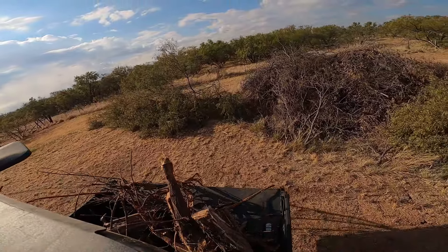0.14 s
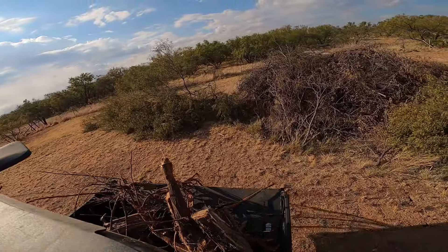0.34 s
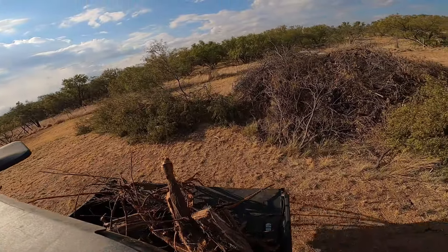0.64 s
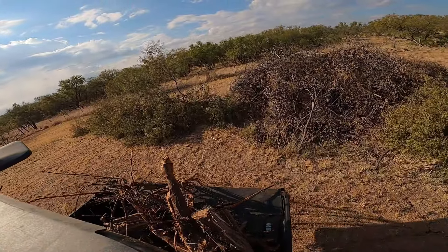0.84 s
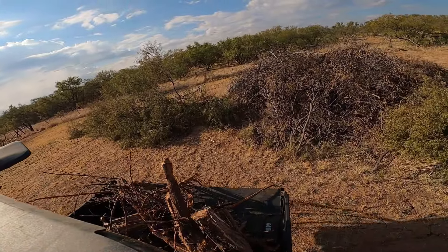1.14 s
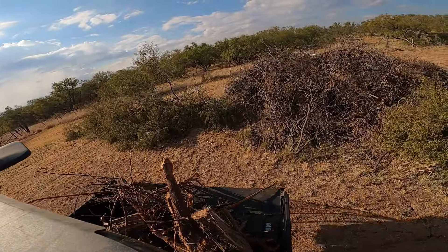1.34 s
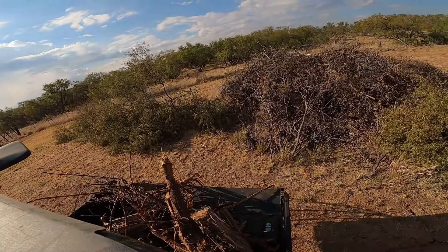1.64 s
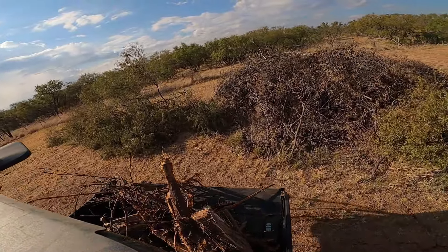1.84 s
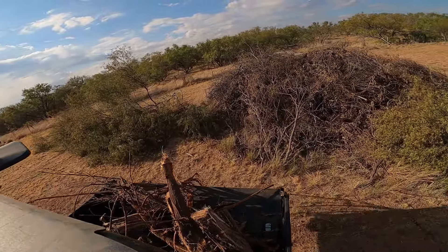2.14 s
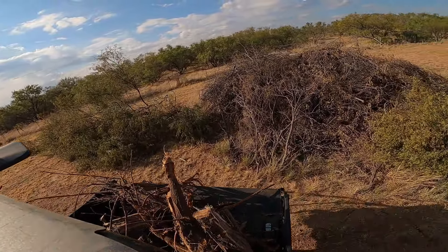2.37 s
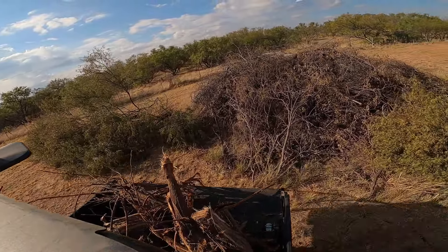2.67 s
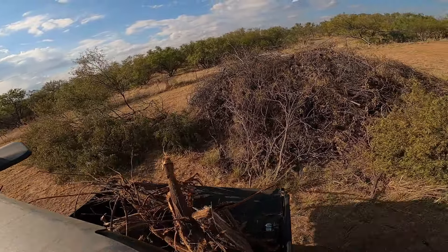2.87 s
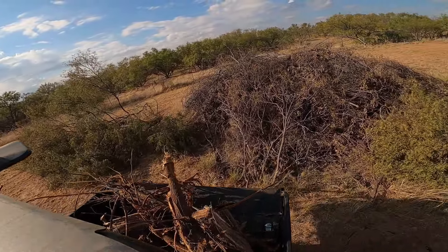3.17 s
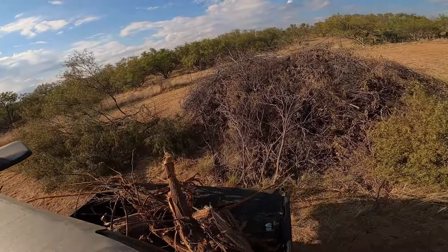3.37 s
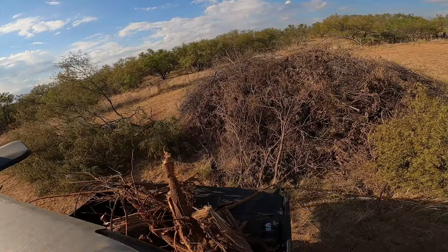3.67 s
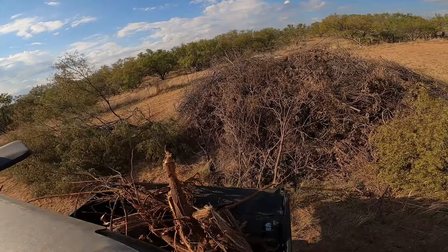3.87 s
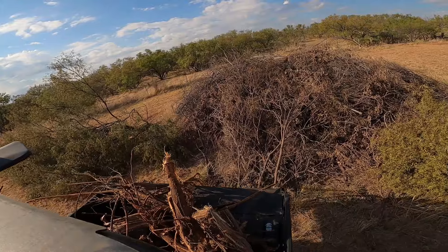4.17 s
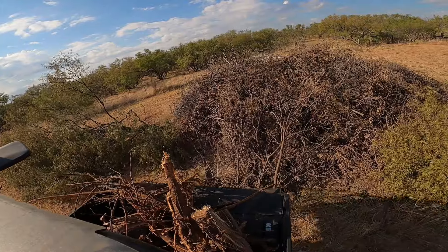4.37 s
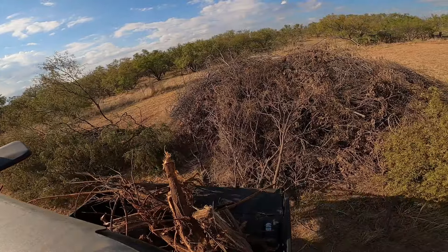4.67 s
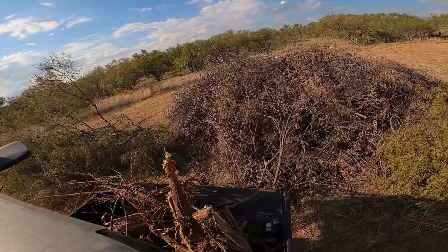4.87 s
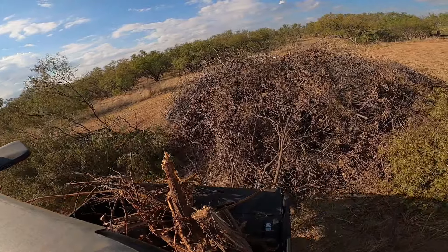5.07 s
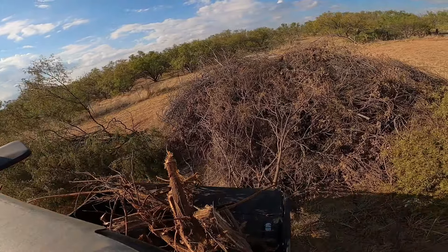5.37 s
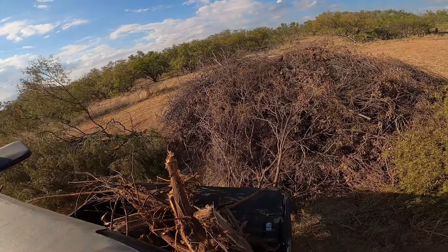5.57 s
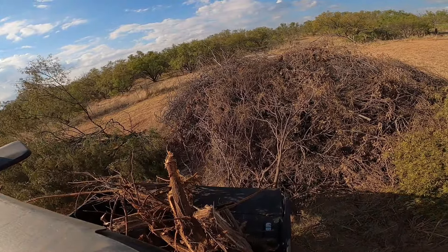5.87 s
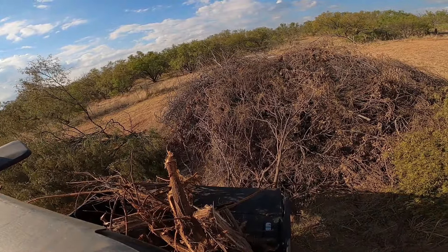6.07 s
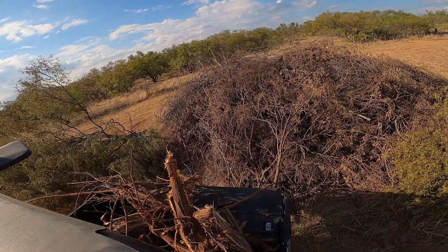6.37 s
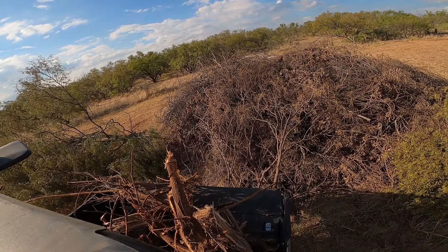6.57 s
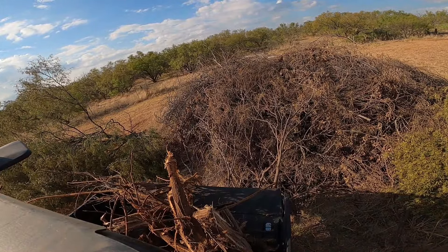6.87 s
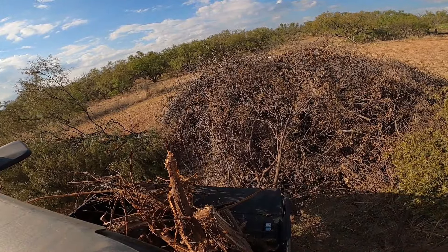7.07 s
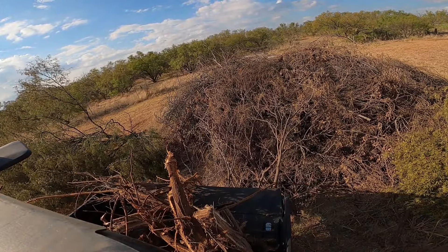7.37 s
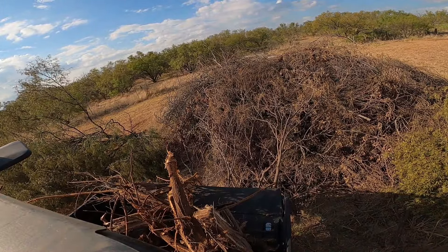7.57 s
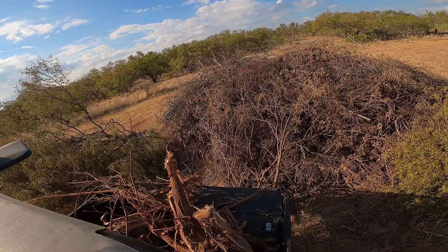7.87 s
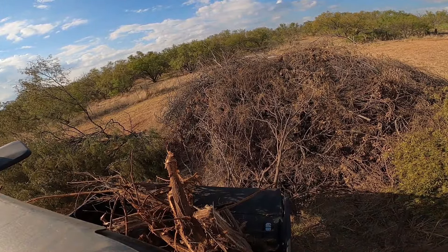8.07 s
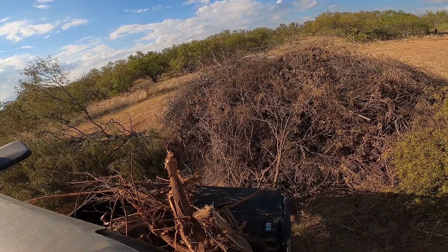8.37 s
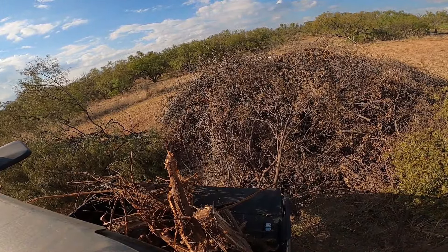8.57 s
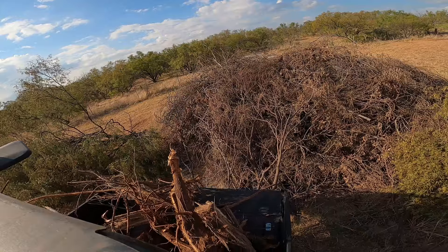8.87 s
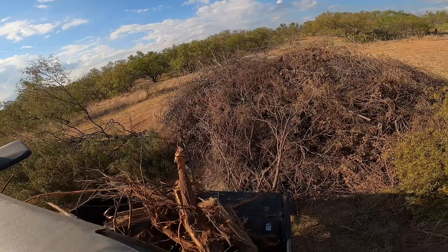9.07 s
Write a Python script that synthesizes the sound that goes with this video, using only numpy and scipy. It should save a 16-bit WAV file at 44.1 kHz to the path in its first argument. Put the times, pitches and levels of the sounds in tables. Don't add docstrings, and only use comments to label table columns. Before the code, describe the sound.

Heard from the roof of a small diesel utility vehicle in open dry country: a droning, chugging engine with buzzing panels and a rattling bed works for five seconds, then drops quickly to a lower, lumpy idle. Low wind thumps buffet the microphone and thin dry hiss comes and goes. Near the end a hard clunk lands as a hydraulic pump starts humming.

```python
import sys
import numpy as np
from scipy import signal
from scipy.fft import rfft, irfft
from scipy.io import wavfile
from scipy.ndimage import uniform_filter1d, minimum_filter1d

SR = 44100
rng = np.random.default_rng(int(sys.argv[2]) if len(sys.argv) > 2 else 0)


def voltage_ratio(level):
    return 10 ** (np.asarray(level, float) / 20)


def materialize(psi):
    bounded = np.clip(np.atleast_2d(psi).T, -1, 1)
    quanta = np.round(bounded * 32767).astype(np.int16)
    wavfile.write(sys.argv[1], SR, quanta)


N = 406602


def curves(table):
    s, *columns = np.transpose(table)
    return [np.interp(np.arange(N) / SR, s, c) for c in columns]


def unit(x):
    return x / np.sqrt(np.mean(x ** 2))


def noise(n=N):
    return rng.standard_normal(n)


def band(x, lo_hz, hi_hz, order=2):
    edges = [lo_hz, min(hi_hz, .45 * SR)]
    return signal.sosfilt(signal.butter(order, edges, "band", fs=SR, output="sos"), x)


def walk(rate_hz):
    k = int(SR / rate_hz)
    held = np.repeat(noise(N // k + 1), k)[:N]
    return unit(uniform_filter1d(uniform_filter1d(held, k), k))


def colour(x, points):
    hz, db = np.transpose(points)
    f = np.maximum(np.fft.rfftfreq(N, 1 / SR), 1)
    return irfft(rfft(x) * voltage_ratio(np.interp(np.log(f), np.log(hz), db)), N)


def spell(start_s, length_s, edge_s):
    t = np.arange(N) / SR
    return np.clip(np.minimum(t - start_s, start_s + length_s - t) / edge_s + .5, 0, 1)


# start_s, length_s, air_gain_db, topmost_band_share_db
HISS_SPELLS = [
    (1.306, .12, 2, 1),
    (2.601, 1.3, 3, -3),
    (4.459, .66, 4.5, -1.5),
    (5.157, .6, 5, 0),
    (5.74, 0.94, 0.5, -1.5),
    (7.207, 2.1, 0, -1),
]


def air():
    usual_top_db, edge_s = -18, .14
    level_db, top_db = -81 + 1.5 * walk(4), usual_top_db + 2 * walk(6)
    for start_s, length_s, gain_db, share_db in HISS_SPELLS:
        bright = spell(start_s, length_s, edge_s)
        level_db = level_db + gain_db * bright
        top_db = top_db + (share_db - usual_top_db) * bright
    low = unit(band(noise(), 9000, 12300, order=5))
    top = unit(band(noise(), 12300, 16000, order=5))
    return voltage_ratio(level_db) * (low + voltage_ratio(top_db) * top)


# start_s, length_s, rumble_db
GUSTS = [(0.02, 0.036, -19), (0.155, 0.11, -23), (0.333, 0.21, -34.5), (1.011, 0.035, -26),
         (1.369, 0.13, -25), (2.64, 0.3, -25.5), (3.125, 0.068, -31.5), (3.543, 0.066, -28),
         (3.667, 0.039, -32), (5.18, 0.092, -28), (5.491, 0.036, -53), (5.979, 0.14, -27),
         (6.249, 0.032, -35), (6.328, 0.036, -27), (6.642, 0.065, -36), (6.854, 0.13, -40),
         (7.174, 0.046, -27), (7.383, 0.075, -36), (7.795, 0.094, -27.5), (7.95, 0.14, -42),
         (8.264, 0.066, -37), (8.496, 0.072, -35)]
# start_s, length_s, level_db
FLAPS = [
    (0.136, 0.16, -28.5),
    (0.42, 0.14, -24),
    (1.286, 0.2, -25.5),
    (3.541, 0.22, -30),
    (3.816, 0.27, -31.5),
    (6.451, 0.53, -43.5),
]


def wind():
    edge_s = 0.14
    breeze = voltage_ratio(-31.5 + 1.4 * walk(9.9))
    gusts = sum(voltage_ratio(db - 2) * spell(s, length, edge_s) for s, length, db in GUSTS)
    flaps = sum(voltage_ratio(db) * spell(s, length, edge_s) for s, length, db in FLAPS)
    rumble = unit(band(noise(), 28, 64.5, order=3))
    buffet = unit(band(noise(), 84.9, 143.5, order=4)) * voltage_ratio(2.1 * walk(25))
    return (breeze + gusts) * rumble + (voltage_ratio(-4) * breeze + voltage_ratio(-14.5) * gusts + flaps) * buffet


# start_s, end_s, pitch_hz, width_hz, level_db
WHISTLES = [
    (5.2, 5.66, 10540, 220, -79),
    (5.05, 5.92, 862, 14, -59),
    (1.5, 2.15, 872, 22, -53),
]


def brake():
    out = 0
    for start_s, end_s, hz, width, db in WHISTLES:
        tone = unit(band(noise(), hz - width / 2, hz + width / 2))
        out = out + voltage_ratio(db) * spell(start_s, end_s - start_s, .08) * tone
    return out


# start_s, peak_db, centre_hz, t60_s
JOLTS = [(1.36, -42, 900, .3), (4.35, -44, 2000, .12), (9.035, -44, 800, .08), (2.645, -31, 230, .15),
         (8.82, -38, 330, .25), (8.876, -22, 370, .2), (8.878, -29, 540, .17), (8.876, -39, 950, .2),
         (8.88, -46, 2300, .2), (6.52, -36, 260, .8), (1.3, -33, 300, .5)]


def jolts():
    out, t = np.zeros(N), np.arange(SR // 2) / SR
    for s, db, hz, t60 in JOLTS:
        tail = (1 - np.exp(-t / .012)) * voltage_ratio(-60 * t / t60)
        knock = voltage_ratio(db) * tail * unit(band(noise(len(t)), hz * 0.7, hz * 1.5))
        i = int(s * SR)
        out[i:i + len(t)] += knock[:N - i]
    return out


# multiple, level_db, throb_depth (0-1)
PUMP_OVERTONES = [
    (2, .5, .12),
    (3, -23, .3),
    (4, -13.5, .35),
    (4.176, -19.5, .2),
]


def pump(firings):
    start_s, loaded_s, free_hz, loaded_hz = 8.765, 8.92, 209, 205.4
    t = np.arange(N) / SR
    load = np.clip((t - loaded_s) / .07 + .5, 0, 1)
    hz = free_hz + (loaded_hz - free_hz) * load
    level_db = -29.5 + 3 * (t - start_s)
    over_db = np.interp(load, (0, 1), (-14, -4))
    turn = 2 * np.pi * np.cumsum(hz) / SR + .06 * walk(30)
    shake = np.cos(2 * np.pi * firings)
    over = 0
    for k, db, depth in PUMP_OVERTONES:
        waver = voltage_ratio(.15 * k ** 2 * walk(40))
        over = over + voltage_ratio(db) * np.sin(k * turn) * (1 + depth * shake) * waver
    frame = voltage_ratio(-13) * load * unit(band(noise(), 290, 620))
    running = np.clip((t - start_s) / 0.021, 0, 1)
    return np.sqrt(2) * running * voltage_ratio(level_db) * (np.sin(turn) + voltage_ratio(over_db) * over + frame)


SHAKE_RISE_S = 0.09
STATE_HZ = (37, 42, 45)
RATTLE_DB = (-51.5, -50.5, -48)
# start_s, swell_db, hold_s, fade_s
SHAKES = [
    (-.1, 7, 0.36, 0.9),
    (1.337, 2.5, 0.67, 0.7),
    (3.654, 3.5, 0.5, 0.42),
    (5.206, 4, 0.11, 0.26),
    (6.49, 4, .45, 0.51),
]


def shaking(hz):
    t, db = np.arange(N) / SR, np.interp(hz, STATE_HZ, RATTLE_DB)
    for s, swell_db, hold, fade in SHAKES:
        rise = np.clip((t - s) / SHAKE_RISE_S, 0, 1)
        db = db + swell_db * rise * np.exp(-np.maximum(t - s - hold, 0) / fade)
    return db


# pitch_hz, level_db
RATTLE_COLOUR = [(90, -34), (150, -12), (210, -12), (280, -14.5), (350, -13), (420, -19), (700, -22.5),
                 (1000, -26), (1550, -30), (1850, -27), (2300, -31.5), (3900, -37), (6000, -45),
                 (7500, -46), (8700, -52), (9500, -64), (12000, -100)]
# pitch_hz, width_hz, pulling_db, rolling_db, idling_db
PANELS = [(700, 90, -8, -5, -7), (1120, 45, -5.5, -2, -1), (1340, 70, -.5, .5, 2), (1645, 50, -9, -7, -9),
          (1820, 200, -9, -8, -4), (2025, 70, -5.5, -4.5, -7), (2715, 130, -7.5, -5.5, -8.5),
          (3370, 80, -12, -12, -12), (3950, 240, -9, -8.5, -11), (5470, 80, -21, -21, -19),
          (6800, 120, -24, -24, -24)]
STRIKES = [(.75, .15, 0), (.32, .6, 1), (.43, .75, 2), (.87, .45, 0), (.6, .15, 1), (.27, .4, 2),
           (.22, .55, 0), (.5, .3, 1), (.2, .2, 1), (.35, .2, 2), (.3, .2, 0)]
BEAT_SHARE = (.55, .8, .8, 1.15)
BODY_DB = (1.5, 2.5, 0, -1)
BED_DB = (0., -0.33, -1.1, -1.1)
RING_DB = (-8, -6.5, -4.5)
# pitch_hz, level_db
RING_EDGES = [(200, -30), (500, 0), (7500, 0), (9300, -30), (13000, -60)]


def rattle(hz, state, firings, chug_db):
    level_db = shaking(hz)
    swell_db = level_db - np.interp(hz, STATE_HZ, RATTLE_DB) - 0.5
    ring_db = np.interp(hz, STATE_HZ, RING_DB) - .4 * swell_db
    buzz_db = 4 * spell(-.2, 1.35, SHAKE_RISE_S)
    broad = colour(noise(), RATTLE_COLOUR)
    broad = broad / np.std(band(broad, 906, 4800, order=4))
    bed_gain = voltage_ratio(np.interp(state, range(4), BED_DB)) - 1
    broad = broad + bed_gain * band(broad, 420, 880, order=1)
    ring = 0
    for (mode, width, pull_db, roll_db, idle_db), (turn, depth, hardest) in zip(PANELS, STRIKES):
        db = np.interp(state, range(3), (idle_db, roll_db, pull_db))
        if 1340 <= mode < 1690:
            db = db + buzz_db
        count = (firings - turn + 1.5).astype(int)
        blow = voltage_ratio(1.3 * noise(N // 500)[count] + 3.5 * (count % 3 == hardest))
        share = depth * np.interp(state, range(4), BEAT_SHARE)
        pulse = 1 + np.cos(2 * np.pi * (firings - turn))
        beat = 1 - share + share * blow * pulse * .8
        tone = band(noise(), mode - .4 * width, mode + .4 * width)
        ring = ring + voltage_ratio(db + 1.1 * walk(2)) * unit(beat * tone)
    whole = broad * voltage_ratio(-0.5 + 0.22 * walk(6.3)) + voltage_ratio(ring_db) * colour(ring, RING_EDGES)
    low, top = band(whole, 60, 500, order=1), band(whole, 5000, 13000, order=1)
    boom_db, treble_db = .5 * level_db, -.46 * level_db
    body_db = np.interp(state, range(4), BODY_DB)
    low_gain = voltage_ratio(boom_db - np.mean(boom_db) + 0.16 * chug_db + body_db) - 1
    top_gain = voltage_ratio(treble_db - np.mean(treble_db)) - 1
    return voltage_ratio(level_db) * (whole + low_gain * low + top_gain * top)


# multiple (of twice the firing rate), level_db
IDLE = [(0.5, -17.5), (1, 4.5), (1.5, -2.5), (2, -14), (2.5, -26), (3, -31.5), (3.5, -25.5), (4, -30),
        (4.5, -21), (5, -22.5), (5.5, -36), (6, -31.5), (6.5, -31), (7, -41), (7.5, -55), (8, -39.5),
        (8.5, -35.5), (9, -36.5), (9.5, -40), (10, -38.5), (10.5, -57), (11, -55)]
ROLL = [(0.5, -24), (1, 0.5), (1.5, -16), (2, -25.5), (2.5, -15.5), (3, -31.5), (3.5, -40), (4, -23),
        (4.5, -26), (5, -45.5), (5.5, -37.5), (6, -38.5), (6.5, -56.5), (7, -49), (7.5, -37.5), (8, -45.5),
        (8.5, -44.5), (9, -43.5), (9.5, -54), (10, -44), (10.5, -55.5), (11, -57)]
PULL = [(0.5, -32), (1, 2.5), (1.5, -18.5), (2, -33), (2.5, -22), (3, -23), (3.5, -26), (4, -22),
        (4.5, -47.5), (5, -34), (5.5, -31.5), (6, -35), (6.5, -36.5), (7, -37), (7.5, -35), (8, -38.5),
        (8.5, -43.5), (9, -41.5), (9.5, -38.5), (10, -41), (10.5, -45.5), (11, -43.5)]
START = [(0.5, -17.5), (1, 1), (1.5, -17), (2, -32.5), (2.5, -19), (3, -26.5), (3.5, -37), (4, -24.5),
         (4.5, -27), (5, -39), (5.5, -34), (6, -34.5), (6.5, -41), (7, -43), (7.5, -48.5), (8, -36.5),
         (8.5, -38.5), (9, -56.5), (9.5, -44), (10, -43), (10.5, -51), (11, -56)]
# multiple (of the three-firing cycle), idling_db, rolling_db, pulling_db, setting_off_db
BETWEEN = [(8, -32, -30.5, -36, -21), (13, -30.5, -37, -36, -36.5), (14, -39, -39.5, -42, -45),
           (16, -35.5, -34.5, -33, -29.5), (17, -25, -28.5, -24, -30), (19, -26.5, -46.5, -36.5, -47),
           (20, -35.5, -36.5, -43.5, -37.5), (22, -46.5, -43.5, -37, -39.5), (23, -39.5, -31, -32, -33),
           (25, -48, -36.5, -48, -33), (26, -42.5, -39, -42, -37), (28, -44.5, -42, -49, -46.5),
           (29, -31, -49.5, -49, -52.5), (31, -41, -49, -41.5, -44), (32, -38.5, -46.5, -42.5, -49),
           (35, -47, -50, -49, -45.5), (37, -35, -47.5, -52, -52.5), (38, -34, -51, -48, -60),
           (43, -41, -45, -48, -45.5), (47, -48, -51, -45, -43), (50, -48, -36, -54.5, -38.5)]
# time_s, gain_db
ROOF = [
    (0, -1.5),
    (2.25, 1),
    (2.45, 5.5),
    (2.7, -0.5),
    (2.95, -1.5),
    (3.4, -3),
    (3.7, -0.5),
    (5.1, 0.5),
    (5.3, 8),
]


def exhaust(state, firings, drone_db, chug_db):
    out, even_db = 0, uniform_filter1d(drone_db, SR)
    tables = np.array([IDLE, ROLL, PULL, START])
    roof_db, = curves(ROOF)
    lines = [(k + 1, tables[:, k, 1]) for k in range(len(IDLE))]
    lines += [(round(m) / 3, state_db) for m, *state_db in BETWEEN]
    for multiple, state_db in lines:
        db = np.interp(state, range(4), state_db) + min(.3 + .2 * multiple, .9) * walk(10)
        db = db + .42 * chug_db * np.clip((multiple - 4) / 4, 0, 1)
        if multiple == 5:
            db = db + roof_db
        lag = 0 if multiple == 2 else .05 * (multiple - 3) ** 2 - 1.95 * (multiple - 3) - .3
        lag = lag + .13 * max(multiple - 10, 0) ** 2 + .011 * multiple * walk(6)
        if multiple % 1 and not 8.8 < multiple < 9.8:
            lag = lag + rng.uniform(0, 2 * np.pi)
        level_db = drone_db if multiple < 4 else even_db
        out = out + voltage_ratio(db + level_db) * np.cos(2 * np.pi * multiple * firings - lag)
    return np.sqrt(2) * out


# time_s, firing_rate_hz, drone_db
ENGINE = [(0, 43.2, -19), (.18, 42.86, -17.5), (.42, 42.74, -18.5), (1.08, 44.07, -14.5),
          (1.4, 44.56, -20.5), (1.6, 45.48, -16.5), (1.95, 45.78, -18), (2.21, 45.1, -17.5),
          (2.67, 44.43, -18), (2.85, 42.37, -21), (3.05, 41.68, -18), (3.9, 42.02, -16), (5.11, 41.76, -18),
          (5.29, 36.42, -21), (5.65, 37.15, -23), (8.8, 36.97, -24), (8.92, 36.74, -26.5),
          (9.22, 36.6, -21)]
# time_s, state (0 idling, 1 rolling, 2 pulling, 3 setting off)
STATE = [
    (0, 3),
    (1.3, 3),
    (1.5, 2),
    (2.65, 2),
    (2.9, 1),
    (5.12, 1),
    (5.3, 0),
    (9.22, 0),
]
# centre_s, depth_db, half_length_s
DROPOUTS = [
    (0.497, 0.5, 0.085),
    (1.485, 12, 0.026),
    (2.777, 4, 0.017),
    (2.834, 9.5, 0.019),
    (5.216, 15, 0.08),
    (5.944, 6, 0.019),
    (6.328, 7.5, 0.031),
    (6.506, 7, 0.033),
    (8.115, 1, 0.035),
]
CYLINDER_DB = (3.2, -1.2, -3)


def scene():
    hz, drone_db = curves(ENGINE)
    state, = curves(STATE)
    t = np.arange(N) / SR
    drone_db = drone_db + 1.5 * walk(16)
    for s, db, half in DROPOUTS:
        drone_db = drone_db - db * np.clip(1 - np.abs(t - s) / half, 0, 1)
    firings = np.cumsum(hz * (1 + 0.002 * walk(8))) / SR
    count = (firings + .7).astype(int)
    size_db = np.array(CYLINDER_DB)[count % 3] + .5 * noise(N // 500)[count]
    chug_db = uniform_filter1d(size_db, SR // 70) * np.interp(hz, STATE_HZ, (.8, .9, .5))
    background = air() + wind() + brake() + jolts() + pump(firings)
    engine = rattle(hz, state, firings, chug_db) + exhaust(state, firings, drone_db, chug_db)
    return (background + engine)[None]


def top_cut(x):
    return signal.sosfilt(signal.butter(12, 15720, fs=SR, output="sos"), x)


def record(dry):
    window = SR // 50
    peak = -minimum_filter1d(-np.abs(dry), size=window)
    gain = np.minimum(1, voltage_ratio(-13.5) / peak) ** .65
    held = dry * uniform_filter1d(gain, size=window)
    held = held * np.clip((N - np.arange(N)) / (.002 * SR), .3, 1)
    return top_cut(held)


dry = scene()
out = record(dry)
materialize(out)
```